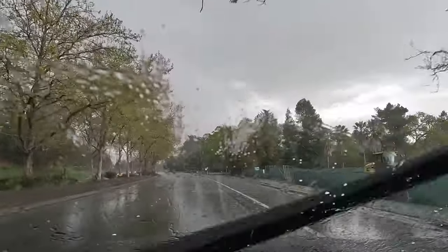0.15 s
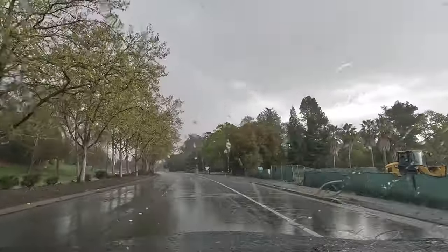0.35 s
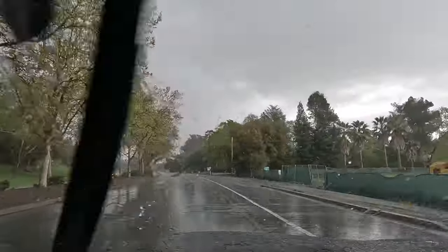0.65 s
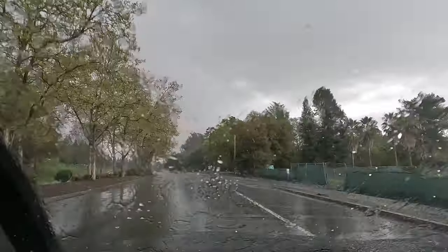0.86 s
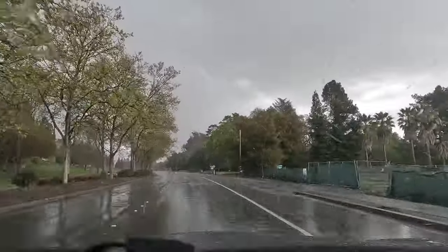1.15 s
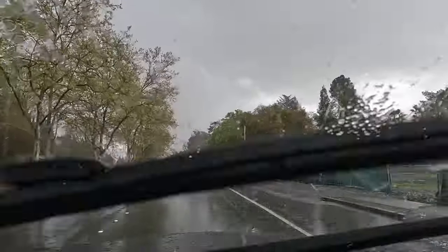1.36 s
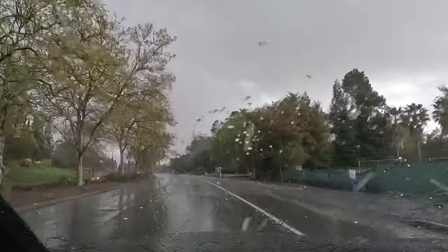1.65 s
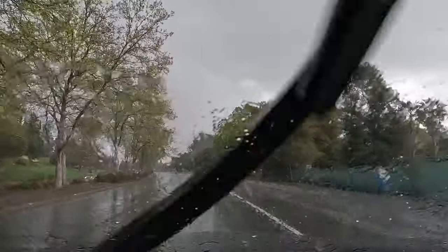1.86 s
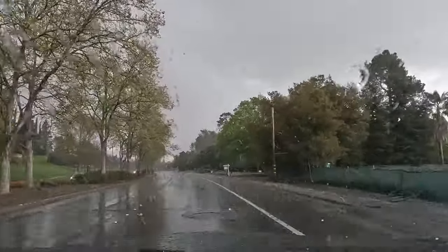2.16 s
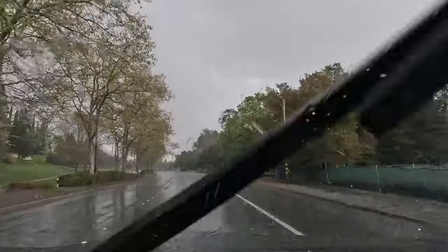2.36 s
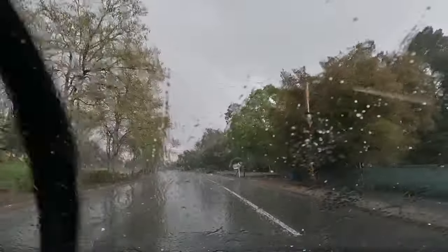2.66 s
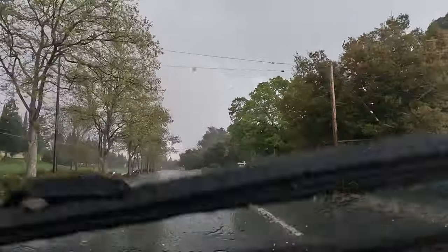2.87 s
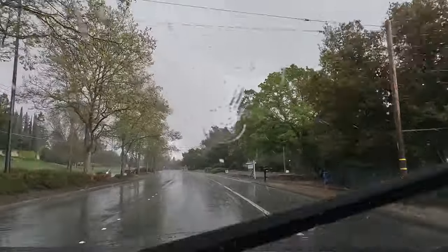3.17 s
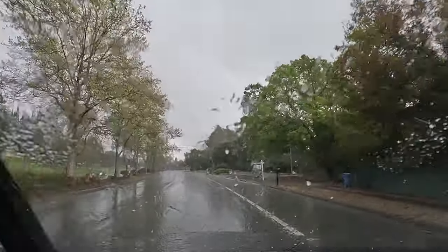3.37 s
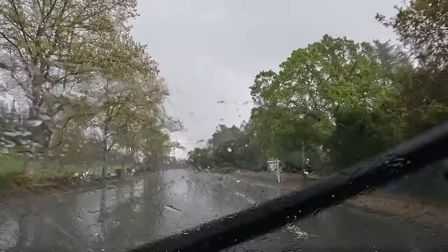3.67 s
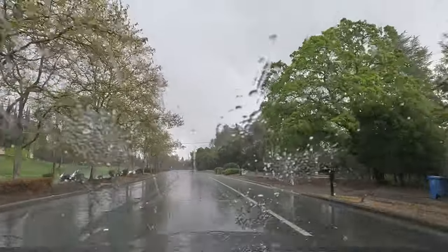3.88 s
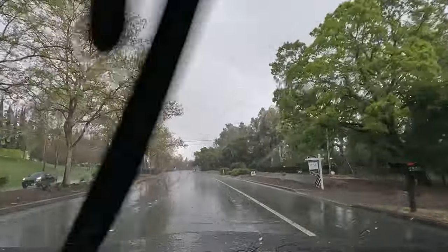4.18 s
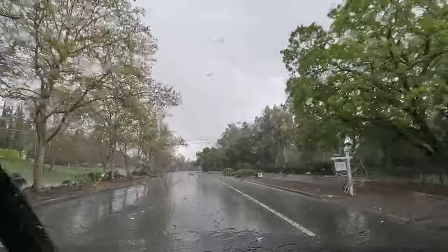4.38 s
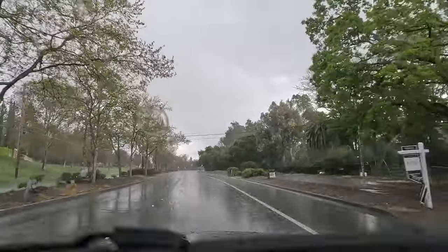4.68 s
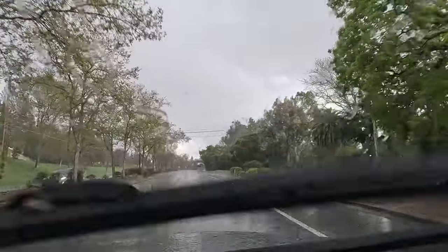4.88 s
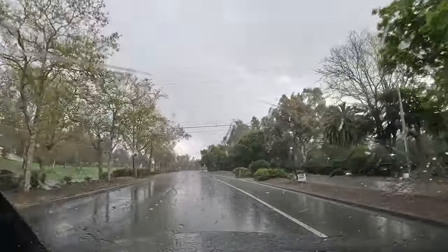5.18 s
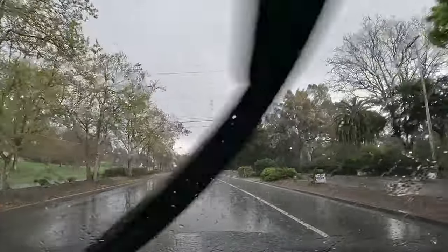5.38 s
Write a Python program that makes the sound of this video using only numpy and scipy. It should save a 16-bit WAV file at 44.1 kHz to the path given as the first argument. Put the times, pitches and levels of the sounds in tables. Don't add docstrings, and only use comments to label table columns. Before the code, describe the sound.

Inside a moving car, with a microphone on the dashboard, hail and heavy rain drum without pause for about 5.5 seconds. Hundreds of tiny stones blur into a dry, dense patter over smooth rain wash, mostly mid-range, with brief dips and bursts. Larger stones crack sharply on the windshield or thud in the roof with a short cabin ring; thin, bright ice ticks snap very close. A firm low wiper knock comes at 0.1, with softer ones near 0.95, 1.85, 2.8 and 3.6, a firm one at 4.5 and another at 5.4. A road bump and panel knocks land around 1.4, with bass swelling to 1.75. Big hits thin out from about 1.7 to 3.5, then crowd again from 3.9, ending with a hard crack at 5.5. Throughout, a deep, lurching cabin boom around 40 hertz, tyre rumble and a faint wavering engine hum continue; the extreme treble is dull.

```python
import sys
import numpy as np
from scipy import signal
from scipy.io import wavfile
from scipy.ndimage import uniform_filter1d

SR = 44100
rng = np.random.default_rng(int(sys.argv[2]) if len(sys.argv) > 2 else 0)


def gain_from_db(level_db):
    decades = np.asarray(level_db, float) / 20
    return 10 ** decades


def master_out(mix):
    frames = np.transpose(np.atleast_2d(mix))
    ceiling = np.clip(frames, -1, 1)
    pcm = np.round(ceiling * 32767).astype(np.int16)
    wavfile.write(sys.argv[1], SR, pcm)


N = 243873


def evened(x):
    return x / np.sqrt(np.mean(x ** 2) + 1e-20)


def columns(rows):
    s, *rest = np.transpose(rows)
    return [np.interp(np.arange(N) / SR, s, column) for column in rest]


def colour(x, points):
    hz, db = np.transpose(points)
    f = abs(np.fft.fftfreq(8192, 1 / SR))
    gain_db = np.interp(np.log(f + 1), np.log(hz), db)
    log_gain = np.log(gain_from_db(np.maximum(gain_db, -100)))
    taps = np.fft.ifft(np.exp(np.conj(signal.hilbert(log_gain)))).real[:4096]
    return signal.oaconvolve(x, taps / np.linalg.norm(taps))[:N]


def resonate(x, hz, width_hz):
    r = np.exp(-np.pi * width_hz / SR)
    if np.ndim(hz) == 0:
        return 2 * signal.lfilter([1 - r], [1, -r * np.exp(2j * np.pi * hz / SR)], x).real
    turn = np.exp(2j * np.pi * np.cumsum(hz) / SR)
    return 2 * (turn * signal.lfilter([1 - r], [1, -r], x / turn)).real


def drift(hz):
    size = int(SR / hz)
    smooth = uniform_filter1d(rng.standard_normal(N), size)
    return evened(uniform_filter1d(smooth, size))


def ring(noise, rise_s, tick_t60, cabin_db, cabin_t60):
    t = np.arange(len(noise)) / SR
    tick = gain_from_db(-60 * t / tick_t60)
    cabin = gain_from_db(cabin_db - 60 * t / cabin_t60)
    return noise * (tick + cabin) * (1 - np.exp(-t / rise_s))


def capsule(x):
    return resonate(resonate(x, 12300, 910), 13200, 1900)


def storm_db():
    # (time [s], patter level [dB])
    patter_level = [(0, -32), (.7, -31), (1.45, -30), (1.8, -34), (2.2, -34), (2.55, -32.5), (2.8, -30.5),
                    (3.0, -34), (3.5, -33.5), (3.95, -32.5), (4.3, -32), (4.7, -33), (5.05, -32), (5.53, -33)]
    # (time [s], level change
    # [dB], length [s])
    lulls_and_bursts = [(0.347, -4.5, 0.033), (0.736, 4, 0.043), (0.824, -6.5, 0.013), (0.908, -4, 0.037),
                        (0.965, -4, 0.039), (1.007, 1.5, 0.036), (1.072, -10, 0.013), (1.282, -4, 0.025),
                        (1.432, 1.5, 0.092), (1.852, -6.5, 0.12), (2.129, -3, 0.41), (2.671, 3.5, 0.12),
                        (2.881, 0, 0.099), (2.973, -4, 0.011), (3.043, -6, 0.029), (3.685, -4, 0.0094),
                        (3.696, 5.5, 0.032), (3.729, -3, 0.028), (3.753, 4, 0.031), (3.798, -2, 0.071),
                        (3.946, 3.5, 0.13), (4.119, -2.5, 0.028), (4.148, 3.5, 0.032), (4.508, -3.5, .012),
                        (4.633, -3, 0.019), (4.735, 2, 0.069), (4.788, -2, 0.047), (5.083, 6, 0.025),
                        (5.141, -6, 0.077), (5.243, 5, 0.042), (5.268, -6, 0.024), (5.317, 5, 0.033),
                        (5.343, -2, 0.012), (5.362, -4, 0.04), (5.454, -5.5, 0.045), (5.515, 8.5, 0.019)]
    t = np.arange(N) / SR
    level_db = columns(patter_level)[0]
    for s, change_db, length in lulls_and_bursts:
        level_db = level_db + change_db * np.exp(-(2 * (t - s) / length) ** 2)
    return level_db


def strays(per_s, db, spread_db, share_db):
    place, size, kind = rng.random((150, 3)).T
    level_db = storm_db()[(place * N).astype(int)] + db + 2 * spread_db * (size - .5)
    shares_db = share_db + 2 * spread_db * (kind - .5)
    rows = np.transpose([place * N / SR, level_db, shares_db])
    return [tuple(row) for row in rows[np.arange(len(rows)) < per_s * N / SR]]


def shower(per_s, spread_db, *blow):
    falls = rng.random(N) < per_s / SR
    size = falls * gain_from_db(spread_db * np.minimum(rng.exponential(1, N), 4))
    patch, out = rng.integers(0, 12, N), np.zeros(N)
    for k, noise in enumerate(rng.standard_normal((12, 4000))):
        out += signal.oaconvolve(size * (patch == k), ring(noise, *blow))[:N]
    return evened(out)


def patter():
    # (frequency [Hz], density [dB per Hz])
    panels = [(130, -17), (300, -1.5), (560, -3.5), (800, -5.5), (1050, -7.5), (1600, -9), (2400, -8),
              (3250, -10), (3900, -18), (7200, -29.5), (8300, -35.5), (10300, -39), (11400, -47),
              (15600, -57)]
    level_db = storm_db()
    hail = shower(700, 1.84, 0.0006, 0.006, -11.0, 0.067)
    drumming = evened(colour(hail + 0.57 * rng.standard_normal(N), panels))
    edges = hail * abs(hail) ** 0.7
    fizz = evened(capsule(edges + .12 * rng.standard_normal(N)))
    return gain_from_db(level_db + 2.0) * drumming + gain_from_db(0.8 * level_db - 41.0) * fizz


def road():
    # (time [s], tyre rumble [dB], floor pan relative to it [dB])
    roughness = [(0, -19.5, -3), (.12, -30.5, 0.5), (.55, -29.5, 3.5), (1.28, -28.5, -1), (1.43, -31, 11),
                 (1.55, -34.5, 12), (1.8, -31, -2), (2.15, -40, 9.5), (2.3, -28, 0), (2.75, -35, 6.5),
                 (3.1, -29, 2), (3.45, -33.5, 2.5), (3.7, -28.5, 2), (4.0, -29.5, 0), (4.6, -29.5, 3.5),
                 (5.2, -32, 2.5), (5.32, -26, -5), (5.53, -33.5, 9)]
    # (frequency [Hz], width [Hz], level [dB])
    modes = [(187, 45, 4), (250.7, 20.5, -3.5), (293.4, 42, 0.5), (445, 38, -4), (561, 62, -5),
             (802.5, 35, -6)]
    rumble_db, pan_db = columns(roughness)
    noise = rng.standard_normal((len(modes) + 1, N))
    body = np.zeros(N)
    for (hz, width, mode_db), n in zip(modes, noise):
        body += gain_from_db(mode_db) * evened(resonate(resonate(n, hz, width), hz, 3 * width))
    pan = resonate(resonate(noise[-1], 54, 52), 124, 87)
    pan = pan / (uniform_filter1d(pan ** 2, 3000) + 1e-12) ** 0.092
    return gain_from_db(rumble_db - 1.5) * evened(body) + gain_from_db(rumble_db + pan_db - 1.0) * evened(pan)


def swells():
    # (start [s], length [s], level [dB], frequency [Hz])
    waves = [(0, 0.048, -15, 38.4), (0.183, 0.13, -19.5, 38.5), (0.35, 0.16, -23, 41.4),
             (0.523, 0.12, -22, 36.2), (0.647, 0.064, -20, 41.2), (0.714, 0.11, -15.5, 33.5),
             (0.844, 0.11, -18, 31.8), (1.016, 0.2, -22.5, 40.35), (1.28, 0.11, -25, 38.95),
             (1.438, 0.18, -15.5, 47.74), (1.56, 0.11, -14.5, 39.8), (1.66, 0.069, -11.5, 35.2),
             (1.732, 0.086, -15, 44.4), (1.91, 0.067, -24.5, 32.7), (2.036, 0.089, -37, 44.9),
             (2.235, 0.13, -23.5, 43.95), (2.37, 0.099, -24, 41.3), (2.472, 0.072, -15, 41),
             (2.594, 0.13, -19.5, 43.8), (2.742, 0.057, -14, 45.94), (2.826, 0.056, -15, 37.8),
             (2.888, 0.089, -16.5, 46.4), (3.006, 0.07, -14.5, 38.9), (3.069, 0.13, -13.5, 31.55),
             (3.189, 0.071, -17.5, 37.65), (3.263, 0.093, -20, 42.2), (3.618, 0.047, -17, 43.8),
             (3.719, 0.078, -18.5, 41.04), (3.876, 0.18, -17, 32.9), (4.081, .12, -18, 35.46),
             (4.39, 0.14, -19.5, 42), (4.511, 0.12, -19, 41.1), (4.677, 0.063, -21, 43.1),
             (4.753, 0.11, -17.5, 45.2), (4.868, 0.097, -24, 41.34), (4.993, 0.055, -17.5, 37),
             (5.038, 0.056, -13, 44.37), (5.173, 0.051, -23.5, 36.1), (5.222, 0.064, -16.5, 38.4),
             (5.304, 0.23, -28, 41.4)]
    edge_s, calm_db = 0.021, -28.5
    t = np.arange(0, N, 64) / SR
    power = gain_from_db(calm_db) ** 2
    for s, length, db, hz in waves:
        start = np.tanh((t - s) / edge_s * 2)
        end = np.tanh((t - s - length) / edge_s * 2)
        power = power + gain_from_db(db) ** 2 * (start - end) ** 2 / 4
    s, length, db, hz = np.transpose(waves)
    now = np.arange(N) / SR
    return np.interp(now, t, 10 * np.log10(power)), np.interp(now, s + length / 2, hz)


def boom():
    db, hz = swells()
    turns = np.cumsum(hz * (1 + 0.0775 * drift(17.14))) / SR
    swing = np.sin(2 * np.pi * turns) * gain_from_db(1.1 * drift(27))
    heave = resonate(resonate(rng.standard_normal(N), 28.2, 16.0), 33, 22)
    shudder = resonate(resonate(rng.standard_normal(N), 55.4, 24.0), 59.7, 38)
    rough = gain_from_db(0.63 * db - 11.5) * evened(heave) + gain_from_db(0.72 * db - 14.5) * evened(shudder)
    return gain_from_db(db - 1.5) * evened(swing) + rough


def engine():
    # (time [s], frequency [Hz], level [dB])
    throttle = [(0, 130.7, -28.5), (.3, 131.6, -29.5), (1.3, 129.3, -30), (1.45, 143.1, -35),
                (1.75, 131.4, -35.5), (2.69, 129.6, -34.5), (2.91, 141.2, -29), (3.4, 141, -47),
                (3.68, 137.2, -28), (3.88, 140.4, -32), (3.99, 127, -35.5), (4.4, 128, -30.5),
                (4.6, 134.5, -36.5), (4.79, 129.2, -30), (5.38, 130.2, -28), (5.43, 130, -21.5),
                (5.53, 125.7, -32)]
    hz, db = columns(throttle)
    turns = np.cumsum(hz * (1 + 0.0085 * drift(27.4))) / SR
    return np.sqrt(2) * gain_from_db(db - 0.5 + 0.46 * drift(24)) * np.sin(2 * np.pi * turns)


def knocks():
    # (middle [s], level [dB], frequency [Hz])
    hits = [(0.013, -34.5, 284), (0.018, -31, 337), (0.031, -21, 186), (0.044, -31, 312),
            (0.054, -24.5, 240.7), (0.067, -33, 322), (0.12, -29.5, 286), (0.529, -29, 301),
            (0.662, -33, 345), (0.679, -37, 263), (0.734, -38, 368), (0.856, -31, 206), (0.911, -37, 224),
            (0.987, -29, 293.5), (0.996, -20.5, 154.9), (1.397, -30.5, 347), (1.422, -15.5, 83.2),
            (1.43, -35, 245), (1.444, -19.5, 143.4), (1.524, -19.5, 94), (1.632, -27.5, 172.6),
            (2.36, -30, 249.8), (2.662, -31, 306), (2.701, -26.5, 197.7), (2.698, -34, 362),
            (2.774, -21, 107.4), (2.801, -26.5, 236), (3.556, -31, 295), (3.25, -24, 75.6),
            (3.702, -30.5, 297), (3.996, -33, 302.6), (4.049, -26, 188), (4.134, -34, 324),
            (2.88, -29, 189), (4.437, -22.5, 196.8), (4.453, -32, 238), (4.911, -31, 200.3),
            (4.951, -29, 231.6), (5.036, -34, 341), (5.084, -31, 300), (5.316, -30, 278), (5.329, -25, 186),
            (5.342, -33, 235.7), (5.409, -29, 298)]
    peak_s = .016
    t, out = np.arange(SR // 8) / SR, np.zeros(N + SR)
    shape = t / peak_s * np.exp(1 - t / peak_s)
    for s, db, hz in hits:
        start = max(round((s - 1.5 * peak_s) * SR), 0)
        out[start:][:len(t)] += gain_from_db(db + 1.0) * shape * np.sin(2 * np.pi * hz * t)
    return out[:N]


def stones():
    # (time [s], blow [dB], roof thud relative to it [dB])
    large = [(0.1532, -21, -12), (0.191, -20, -3), (0.2598, -17, -5), (0.3092, -16.5, -7),
             (0.4293, -19.5, -25), (0.487, -15.5, -12), (0.553, -19, -17), (0.7268, -15, -13),
             (0.8355, -19, -2), (0.948, -21, -13), (0.9914, -14.5, -4), (1.072, -23, -8), (1.3043, -21, 1),
             (1.4621, -16.5, -2), (2.2907, -23, -17), (2.616, -24, -9), (2.6364, -20, -17),
             (2.8614, -31, -18), (2.9853, -18, -15), (3.1602, -18, -20), (3.9911, -22, 3),
             (4.5178, -21, -18), (4.6554, -17.5, 1.5), (4.6962, -15.5, 1), (4.7995, -19.5, 1.5),
             (4.9745, -18, 0), (5.0768, -24, -7), (5.161, -20, -13), (5.1929, -17.5, -7), (5.5095, -12, -6)]
    # (time [s], thud [dB], crack relative to it [dB])
    on_roof = [(0.022, -29, -12), (0.058, -23, -4), (0.521, -17, -2), (0.587, -21, 2.5),
               (1.072, -13.5, -19), (1.4, -16, -6), (1.524, -19, -2), (1.57, -14, -9), (1.621, -18.5, -13),
               (1.68, -22, -16), (2.36, -20, -18), (2.516, -30, 3), (2.635, -27, -3), (3.066, -30, 4),
               (3.102, -25, 4), (3.269, -28, -4), (3.553, -31, -1), (3.69, -23, -13), (3.818, -30, -14),
               (3.962, -15, -11), (3.986, -15.5, -3), (4.132, -24, -8), (4.414, -18.5, -19),
               (4.523, -14, -2.5), (4.656, -35, -8), (4.874, -19, 0), (4.974, -15, -11),
               (5.001, -16.5, -10), (5.35, -15.5, -6), (5.493, -21, -9)]
    # (time [s], blow [dB], roof thud relative to it [dB])
    pebbles = [(0.1, -15, -15), (0.161, -10.5, -12), (0.272, -14, -7), (0.3781, -14, -15),
               (0.5353, -20, -12), (0.5624, -19, -12), (0.6645, -8.5, -2), (0.853, -13, -17),
               (0.872, -13, -14), (1.0126, -8, -16), (1.03, -15, -15), (1.2162, -15, -9),
               (1.2451, -19, -14), (1.423, -15, -9), (1.6488, -18, -15), (1.744, -15, -16),
               (1.767, -24, -12), (1.8217, -16.5, -12), (1.9125, -28, -10), (1.976, -29, -12),
               (2.0384, -17.5, -18), (2.0663, -22, -7), (2.1678, -17, -15), (2.202, -20, -16),
               (2.2554, -15.5, -2), (2.4353, -10.5, 1), (2.5325, -14, -1), (2.683, -20, -16),
               (2.819, -11, 5), (2.91, -8.5, -3), (2.9237, -10, 1), (3.0286, -13.5, -19),
               (3.1412, -12, -12), (3.2182, -14, -14), (3.237, -14, -12), (3.3015, -27, -15),
               (3.6882, -15, -8), (3.7503, -19, -2), (3.8809, -10.5, 0), (3.973, -17, -12),
               (4.0215, -21, -9), (4.0406, -14, -10), (4.1463, -12, -10), (4.2543, -17, -1),
               (4.372, -21, -12), (4.406, -27, -12), (4.423, -20, -12), (4.5293, -18, -12),
               (4.5448, -11, -8), (4.6638, -12, -7), (4.744, -12, -15), (4.9026, -17, -14),
               (5.029, -13, -7), (5.0852, -13, -9), (5.109, -17, 2), (5.2243, -13, -14), (5.2491, -12, 2),
               (5.32, -18, -10), (5.4008, -14, -12), (5.4089, -15, -8)]
    # (frequency [Hz], level [dB])
    crack_tone = [(300, -46.5), (1000, -5.5), (1800, -1.5), (2600, 1.5), (3400, -5.5), (4200, -10),
                  (7000, -28), (9000, -32), (15500, -49)]
    # (frequency [Hz], level [dB])
    thud_tone = [(150, -66), (350, -13), (800, -9), (1500, -20), (2500, -23), (5000, -79)]
    push_db, contact_s = 11, .0003
    rows = [*large]
    rows += [(s, db + crack_db + 1.5, -crack_db - 1.5) for s, db, crack_db in on_roof]
    rows += [(s, db - 7.5, thud_db) for s, db, thud_db in pebbles]
    rows += strays(per_s=3, db=11, spread_db=3, share_db=-13)
    crack, thud = np.zeros((2, N + 6000))
    noise = rng.standard_normal((210, 2, 5000))
    for (s, db, thud_db), (a, b) in zip(rows, noise):
        start = round((s + .001) * SR)
        at = slice(start, start + len(a))
        crack[at] += gain_from_db(db - 14) * ring(a, contact_s, 0.045, -11.5, 0.39)
        thud[at] += gain_from_db(db + thud_db - 11.0) * ring(b, contact_s, 0.037, -13.0, 0.16)
        crack[start] += gain_from_db(db + push_db)
        thud[start] += gain_from_db(db + thud_db + push_db)
    return colour(crack, crack_tone) + colour(thud, thud_tone)


def ticks():
    # (time [s], level [dB], share of
    # the top band [dB])
    shards = [(0.056, -31, -24), (0.1015, -36, -20), (0.1516, -25, -25), (0.2608, -34, -25),
              (0.3092, -27, -24), (0.3696, -25, -29), (0.4843, -25, -21), (0.5531, -40, -25),
              (0.7053, -30, -14), (0.8355, -27.5, -21), (0.8686, -22, -16), (0.946, -29, -20),
              (0.9903, -26, -22), (1.302, -25, -27), (1.3433, -31, -25), (2.5728, -27, -21),
              (2.9836, -29, -19), (3.5575, -32, -24), (3.6107, -30, -24), (3.8955, -30, -24),
              (3.9888, -29, -24), (4.0216, -29, -28), (4.145, -26.5, -12), (4.3131, -30, -28),
              (4.5176, -26, -28), (4.6545, -24.5, -20), (4.717, -24.5, -30), (4.9511, -27, -15),
              (5.1575, -32, -21), (5.2809, -38, -27), (5.5098, -28, -7),
              (0.2324, -32, -21), (0.2907, -31, -23), (0.4595, -26, -14), (0.597, -31, -24),
                 (0.7282, -32, -21), (0.9687, -33, -25), (1.1384, -41, -23), (1.3932, -30, -27),
                 (1.5724, -31, -27), (1.695, -31, -20), (1.7858, -38, -13), (2.0378, -35, -21),
                 (2.1996, -37, -21), (2.5321, -34, -27), (2.596, -38, -23), (2.7362, -29, -26),
                 (2.789, -29, -16), (2.8194, -42, -25), (3.0133, -33, -24), (3.0555, -37, -19),
                 (3.1293, -30, -24), (3.6664, -34.5, -21), (3.8273, -33, -10), (3.9075, -26, -19),
                 (4.0475, -34, -17), (4.109, -35, -19), (4.8768, -32, -11), (4.902, -33, -22),
                 (5.084, -32, -15), (5.4895, -35, -19)]
    # (time [s], level [dB], share of the top band [dB])
    chips = [(0.1626, -30, -23), (0.3821, -22, -23), (0.6585, -19, -16), (1.0904, -30, -19),
             (1.2452, -29, -23), (1.317, -27, -23), (1.4018, -18, -23), (1.6742, -28, -23),
             (1.7138, -26, -23), (1.742, -31, -23), (1.768, -33, -23), (1.8466, -27, -23),
             (1.9196, -30, -23), (1.9536, -36, -23), (2.0104, -32, -23), (2.0892, -32, -23),
             (2.213, -32, -23), (2.2416, -27, -23), (2.297, -26, -23), (2.3526, -31, -23),
             (2.3706, -29, -23), (2.3834, -32, -23), (2.4824, -24, -23), (2.5877, -23, -23),
             (2.616, -28, -21), (3.084, -24, -23), (3.1458, -28, -23), (3.2376, -32, -23),
             (3.2486, -35, -23), (3.3474, -37, -23), (3.4152, -28, -23), (3.4531, -30, -23),
             (3.4725, -31, -23), (3.4901, -35, -23), (3.6886, -32, -23), (3.7053, -33, -23),
             (3.8097, -44, -19), (4.1995, -24, -23), (4.247, -28, -23), (4.0776, -23, -16),
             (4.2912, -26, -24), (4.3449, -27, -23), (4.4639, -23, -23), (4.5441, -25, -21),
             (4.5856, -22, -23), (4.6963, -25, -23), (4.7416, -26, -23), (4.9178, -20, -23),
             (4.9305, -28, -23), (4.9757, -23, -23), (5.0246, -20, -23), (5.0757, -31, -23),
             (5.2318, -34, -23), (5.2455, -31, -18), (5.292, -29, -23), (5.314, -24, -23),
             (5.3728, -24, -23), (5.3943, -30, -23), (5.462, -27, -17), (5.4356, -30, -23)]
    # (frequency [Hz], level [dB])
    ice_tone = [(3000, -19), (5000, 6), (7000, 3), (8500, -4), (10300, -7.5), (11400, -17), (15500, -19)]
    rows = shards
    rows += [(s, db - 8.5, top_db) for s, db, top_db in chips]
    rows += strays(per_s=9.8, db=-10.5, spread_db=9, share_db=-16.5)
    body, top = np.zeros((2, N + 3000))
    noise = rng.standard_normal((210, 2, 3000))
    t = np.arange(3000) / SR
    needle = np.exp(-((t - .0018) / .0015) ** 2)
    for (s, db, top_db), (a, b) in zip(rows, noise):
        start = round(s * SR)
        at = slice(start, start + len(a))
        body[at] += gain_from_db(db - 13.0) * (0.87 * needle * a + 0.66 * ring(a, 0.0034, 0.09, -12, 0.16))
        top[at] += gain_from_db(db + top_db + 6) * (needle ** 2 * b + .12 * ring(b, .0015, .025, -13, .08))
        body[start + 70] += gain_from_db(db + 3.5)
        top[start + 80] += gain_from_db(db + top_db + 25)
    return colour(body, ice_tone) + capsule(top[:N])


def thumps():
    # (time [s], level [dB], frequency [Hz], t60 [s])
    landings = [
        (0.092, -7, 109.7, 0.18),
        (0.959, -18.5, 107.6, 0.46),
        (1.38, -15, 91.2, 0.49),
        (1.839, -24.5, 103.3, 0.5),
        (2.791, -20.5, 102.8, 0.43),
        (3.63, -18.5, 106.6, 0.44),
        (4.489, -10.5, 106.3, 0.24),
        (5.37, -17, 110.7, 0.31),
    ]
    t, out = np.arange(SR // 2) / SR, np.zeros(N + SR)
    for s, db, hz, t60 in landings:
        swell = 1 - np.exp(-t / 0.039)
        knock = gain_from_db(db - 60 * t / t60) * swell * np.sin(2 * np.pi * hz * t)
        out[round(s * SR):][:len(t)] += 2 * knock
    return out[:N]


def scene():
    hail = patter() + stones() + ticks()
    car = road() + boom() + engine() + knocks() + thumps()
    return (hail + car)[None]


def roll_off(x):
    return signal.sosfilt(signal.butter(12, 15730, fs=SR, output="sos"), x)


def record(dry):
    limited = 0.6 * np.tanh(dry / 0.61)
    return roll_off(limited)


dry = scene()
out = record(dry)
master_out(out)
```